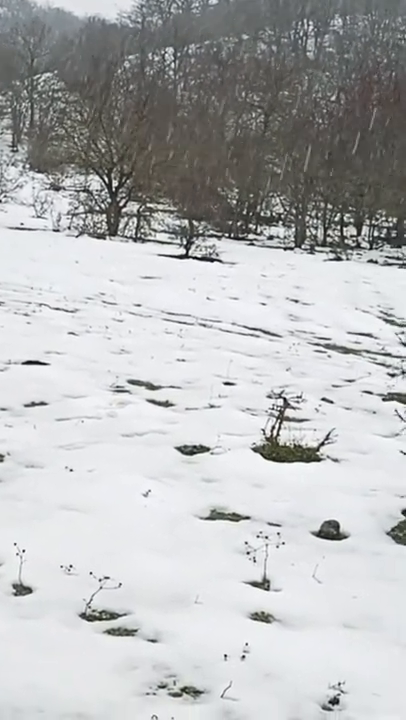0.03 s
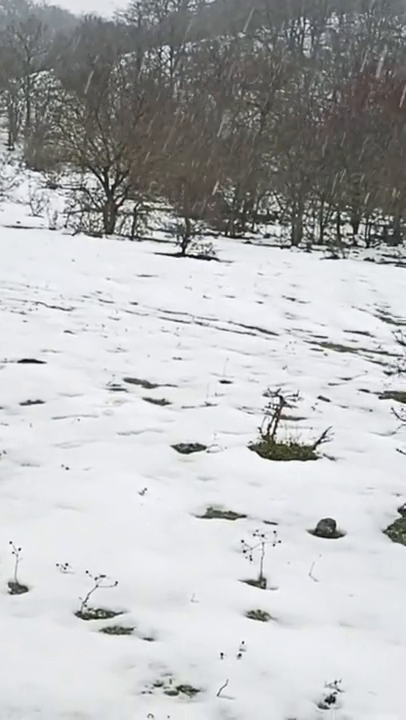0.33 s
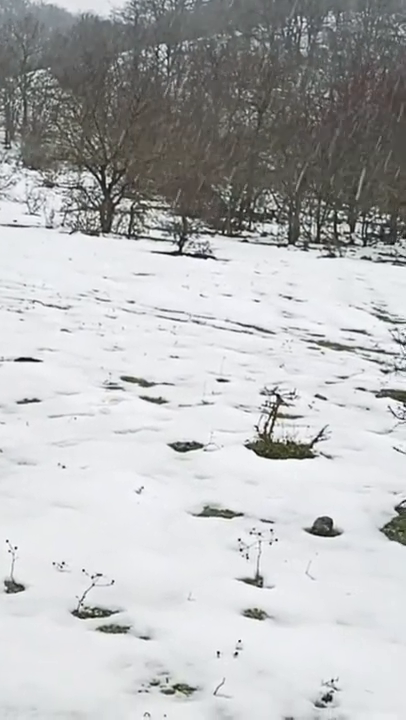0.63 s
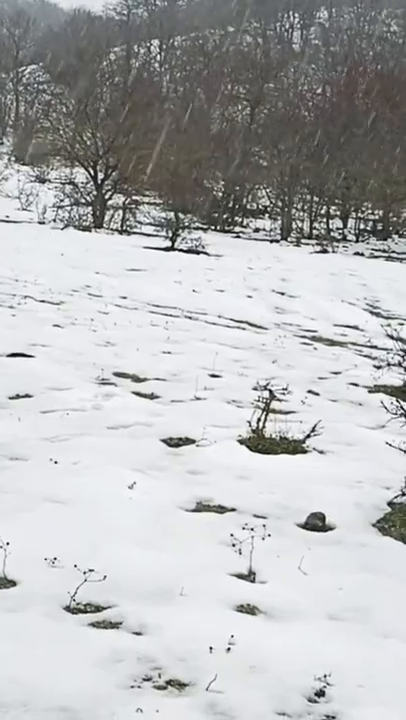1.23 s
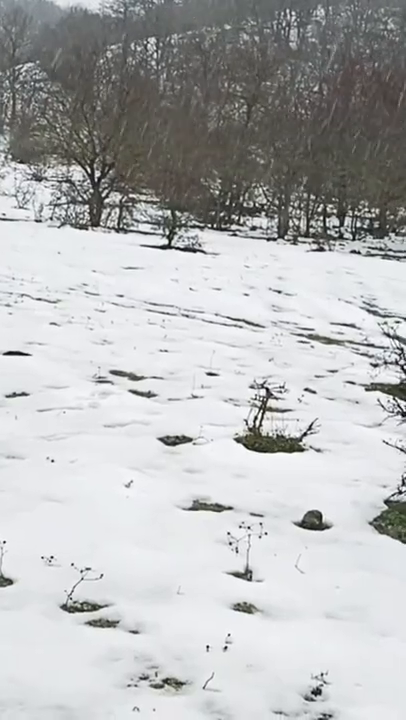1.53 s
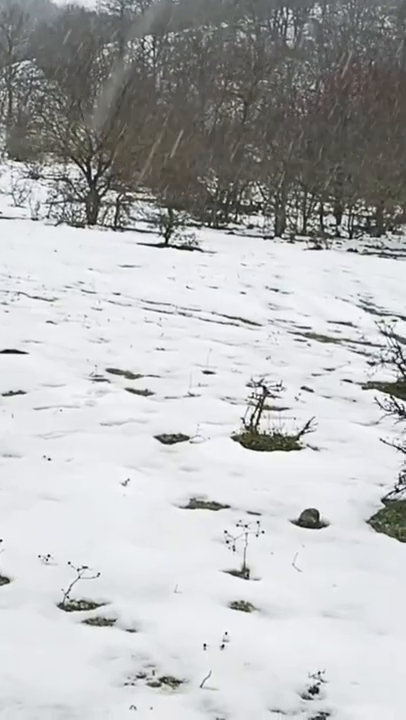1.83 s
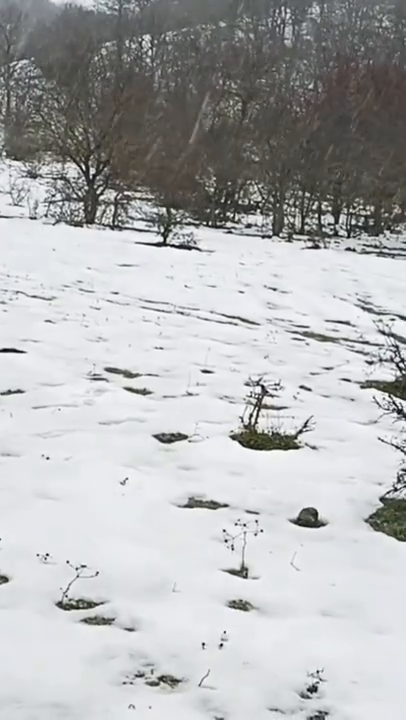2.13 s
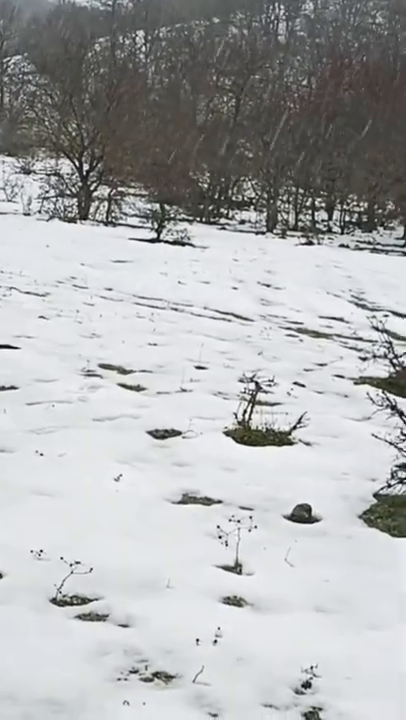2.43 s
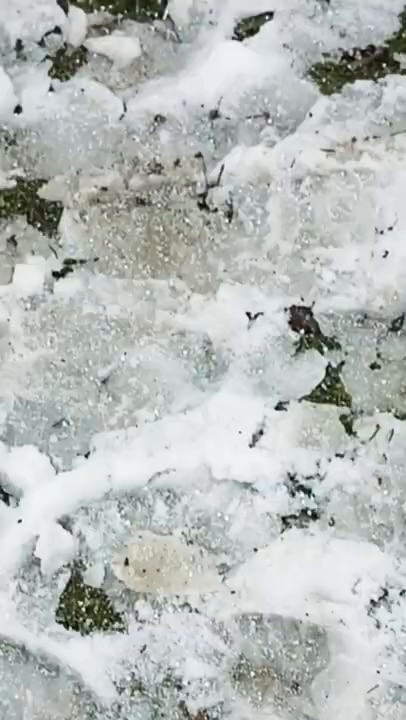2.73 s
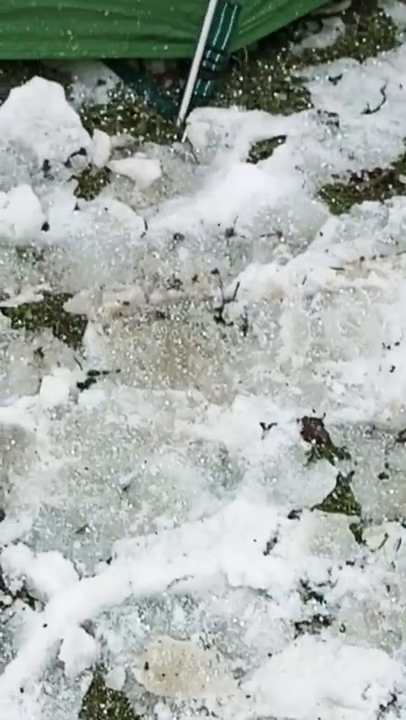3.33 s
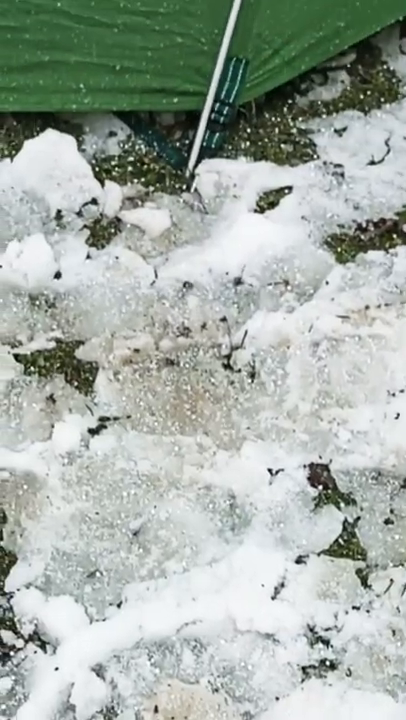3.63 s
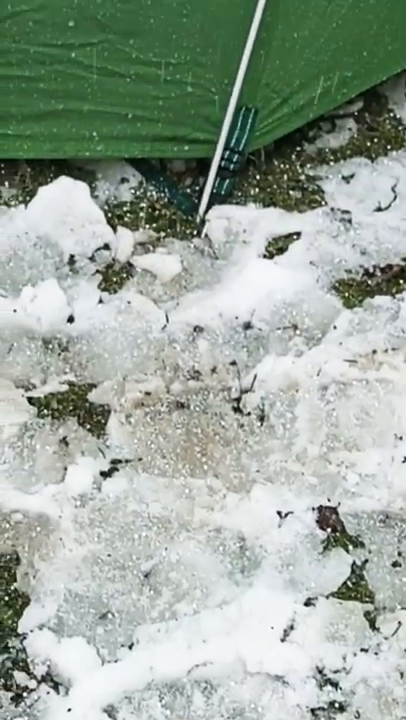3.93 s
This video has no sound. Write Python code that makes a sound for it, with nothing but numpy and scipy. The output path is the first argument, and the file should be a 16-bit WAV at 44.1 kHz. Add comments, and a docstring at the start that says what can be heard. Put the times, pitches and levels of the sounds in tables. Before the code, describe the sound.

Hail falls on a tent in a snowy field, with sharp nearby taps over countless tiny ticks and brief low wind buffets on the left. The sound cuts for an instant, then continues as a finer, thicker patter.

```python
"""A patter of fine hail on a tent in a snowy field: countless small impacts, the farthest merging into hiss.
Close by, single stones snap and thud on the taut fabric and tick as their ice crumbles, while puffs of
turbulent wind buffet the left microphone. The sound drops out for an instant and returns facing the
icy ground, where the patter is denser and finer."""
import sys
import numpy as np
from scipy import signal
from scipy.fft import rfft, irfft
from scipy.io import wavfile
from scipy.ndimage import uniform_filter1d

SR = 44100
rng = np.random.default_rng(int(sys.argv[2]) if len(sys.argv) > 2 else 0)


def master(y):
    """Save y as 16-bit WAV."""
    cut = np.clip(np.atleast_2d(y).T, -1, 1)
    pcm = np.round(cut * 32767)  # scale
    wavfile.write(sys.argv[1], SR, pcm.astype(np.int16))


N = 176400
MILLISECOND = 1 / 1000
PULSE_SIZE = 256  # samples
TICK_HZ, TICK_OCTAVES = 8840, 1.8  # centre and width of an icy tick
BREAK_S = 2.774  # the field gives way to the ice


def from_db(db):
    """Decibels are logarithmic: each 20 dB multiplies the amplitude by ten."""
    return 10 ** (np.asarray(db) / 20)


def unit(x):
    """Normalisation: the energy, or sum of squares, becomes one."""
    return x / np.sqrt(np.sum(x ** 2) + 1e-20)


def add(out, x, s):
    """Superposition: x adds to out from s seconds on."""
    i = max(int(s * SR), 0)
    out[i:i + len(x)] += x[:max(len(out) - i, 0)]


def at_hz(points, size):
    """Interpolation over log frequency gives a curve's value at each bin of a transform."""
    hz, value = np.transpose(points)
    bin_hz = np.arange(size // 2 + 1) * SR / size
    return np.interp(np.log(bin_hz + 1), np.log(hz), value)


def coloured(x, points, size=8192):
    """Minimum-phase filtering: folding the cepstrum makes the given response causal."""
    cepstrum = irfft(np.log(from_db(at_hz(points, size))))
    cepstrum[1:size // 2] *= 2
    cepstrum[size // 2 + 1:] = 0
    return signal.fftconvolve(x, irfft(np.exp(rfft(cepstrum))))[:len(x)]


def pulse(hz, octaves, turn):
    """An impact is brief, hence broadband: a bell-shaped spectrum around hz, its phase given in turns."""
    distance = np.log2((np.arange(PULSE_SIZE // 2 + 1) * SR / PULSE_SIZE + 1) / hz)
    spectrum = np.exp(-(distance / octaves) ** 2 + 2j * np.pi * turn)
    return unit(np.roll(irfft(spectrum), PULSE_SIZE // 2))


def burst(decay_s, size=2048):
    """Damping: noise of unit energy dies away exponentially."""
    return unit(rng.standard_normal(size) * np.exp(-np.arange(size) / SR / decay_s))


def through_fabric(blow, seam_s):
    """Waves in a membrane: a blow ripples, shivers and reflects from a seam, its energy conserved."""
    ripple = from_db(-10.5) * burst(decay_s=0.001)
    shiver = from_db(-18) * burst(decay_s=0.005)
    response = np.r_[1, ripple + shiver]
    add(response, from_db([-7.5]), seam_s + 0.5 / SR)  # the echo from the seam
    return unit(signal.fftconvolve(blow, response)) * np.sqrt(np.sum(blow ** 2))


def flurry():
    """Modulation of the hail: a slow level in dB, random clumps of spread 1, and the hiss's gain."""
    # Each row: time in seconds, strength of the patter in dB.
    strength = [(0, -1), (.2, -2.5), (.6, -2), (1.0, -1.5), (1.3, -1), (1.65, -0.5), (1.8, -3), (2.1, 0),
                (2.3, -2), (2.6, -2), (2.93, -1), (3.33, -3.5), (3.44, -3), (3.62, -2.5), (4, -1.5)]
    flurry_db = np.interp(np.arange(N) / SR, *np.transpose(strength))
    clump_s, hiss_share = 0.016, 0.68
    window = int(clump_s * SR)
    clumps = uniform_filter1d(uniform_filter1d(rng.standard_normal(N), window), window)
    clumps /= clumps.std()
    return flurry_db, clumps, from_db(hiss_share * (flurry_db + clumps))


def hiss(spectrum, level_db):
    """Incoherent addition: far grains and moving air merge into noise, alike in both ears only low down."""
    # Each row: frequency in Hz, correlation between the ears.
    likeness = [(50, 0.1), (130, 0.73), (300, 0.61), (640, 0.59), (1300, -0.83), (2500, -0.14),
                (15000, -0.031)]
    alike = np.clip(at_hz(likeness, N), -1, 1)
    mid, side = rfft(rng.standard_normal((2, N)))
    ears = np.sqrt((1 + alike) / 2) * mid + np.sqrt((1 - alike) / 2) * side * [[1], [-1]]
    return irfft(ears * from_db(level_db + at_hz(spectrum, N)), N)


def patter(per_s, level_db, spread_db, middle_hz, scatter_octaves, width_octaves, spots=32):
    """Shot noise: small stones land at random on many spots, each with its own pitch and direction."""
    out = np.zeros((2, N))
    size_limit, seam_s = 3.23, 0.00045  # the limit counts spreads above level_db
    sizes = from_db(level_db + spread_db * np.minimum(rng.exponential(1, N), size_limit))
    clicks = sizes * (rng.random(N) < per_s / SR) * rng.choice([-1, 1], N)
    spot = rng.integers(0, spots, N)
    for k, quantile in enumerate((np.arange(spots) + 0.5) / spots):
        hz = middle_hz * 2 ** (scatter_octaves * np.log(quantile / (1 - quantile)) / 2)
        tick = from_db(rng.normal(-2, 4.9)) * pulse(TICK_HZ, TICK_OCTAVES, rng.random())
        blow = pulse(hz, width_octaves, rng.random()) + tick
        for ear in out:
            landing = through_fabric(blow, seam_s * rng.uniform(0.45, 2))
            delay_s = rng.uniform(0, 0.5) * MILLISECOND
            add(ear, signal.oaconvolve(clicks * (spot == k), landing), delay_s)
    return out * np.sqrt(SR * MILLISECOND)


def hail_on_field(flurry_db, clumps, swell):
    """Common modulation: far hiss and nearer patter rise and fall with the same flurry."""
    # Each row: frequency in Hz, relative level of the hiss in dB.
    spectrum = [(20, -21), (45, -17), (80, 4.5), (150, 1), (400, 0.5), (1000, -1), (2500, 1.5), (4500, -4),
                (8000, -6.5), (12000, -5), (15500, -4)]
    far = swell * hiss(spectrum, level_db=-44.5)
    return far + patter(per_s=330 * from_db(4.5 * clumps), level_db=flurry_db - 54.5, spread_db=4,
                        middle_hz=2750, scatter_octaves=0.32, width_octaves=0.52)


def near_stones():
    """Impulsive excitation: each stone snaps the fabric, pushes it with a thud and ticks as it crumbles."""
    # Each row: time in seconds, snap level in dB, snap pitch in Hz, snap width in octaves, thud and tick levels
    # in dB before their fixed gains, delay of the seam's echo in ms, lead of the left ear in ms.
    stones = [(0.0385, -32.5, 3200, 0.54, -60.0, -42, 0.67, 0.016),
              (0.0972, -37.5, 2630.0, 0.61, -58, -47, 0.63, 0.1),
              (0.1275, -20.5, 2500, 1, -38, -28, 0.37, 0.42),
              (0.1624, -39, 3200.0, 1.1, -60.0, -53, 0.29, 0.26),
              (0.1818, -46, 4540, 0.27, -32.0, -38, 0.63, 0.38),
              (0.2058, -50.0, 4400.0, 1.4, -60, -35, 0.76, 0.3),
              (0.2141, -37, 5500, 0.7, -56, -29.5, 0.43, -0.019),
              (0.226, -28.0, 3020.0, 0.88, -38.5, -32.5, 0.3, 0.38),
              (0.2884, -39, 2970.0, 0.49, -60.0, -35.5, 0.44, 0.34),
              (0.311, -33.5, 2410.0, 1.35, -54.0, -38, 0.28, 0.28),
              (0.3133, -29, 2820, 0.68, -43, -39, 0.7, 0.38),
              (0.402, -40, 2100, 0.5, -44.5, -34.5, 0.95, 0.31),
              (0.461, -38.5, 2950.0, 0.74, -43, -58, 0.46, -0.13),
              (0.6265, -25.5, 2510.0, 1.43, -35.5, -37, 0.48, -0.18),
              (0.7307, -49, 2820.0, 0.56, -47, -46, 0.62, 0.3),
              (0.7428, -30.5, 1720, 0.88, -59, -39.0, 0.29, 0.27),
              (0.876, -32, 2550, 1.3, -39.5, -38, 1.03, 0.46),
              (0.8875, -37.5, 2690.0, 0.58, -62, -45, 0.82, 0.43),
              (0.9443, -26.5, 2990, 1.26, -41, -32.5, 0.26, 0.33),
              (0.9803, -20.5, 1820, 0.87, -40.5, -35, 0.36, 0.27),
              (1.067, -40, 2470.0, 1.6, -53, -41, 0.24, 0.43),
              (1.1732, -35.5, 2080.0, 0.71, -50, -42, 0.81, -0.1),
              (1.1859, -37, 2970.0, 0.61, -39, -44.0, 0.8, -0.13),
              (1.3095, -21.5, 2580, 0.52, -40.5, -28.5, 0.51, 0.32),
              (1.3336, -36.5, 2060.0, 0.38, -52, -31, 0.47, -0.1),
              (1.355, -37.5, 2550.0, 0.73, -60.0, -35, 0.98, -0.13),
              (1.467, -28, 2400, 0.58, -54.0, -26.5, 0.24, 0.31),
              (1.545, -26, 1920.0, 0.65, -41, -44, 0.97, 0.26),
              (1.6009, -26.5, 2800, 0.66, -39.5, -31, 0.56, 0.3),
              (1.6185, -28.5, 4100, 0.94, -60.0, -33.5, 0.88, -0.37),
              (1.6603, -42, 4340, 0.64, -34, -37, 0.92, 0.4),
              (1.6662, -32, 3460.0, 0.88, -53, -34.5, 0.42, -0.28),
              (1.9123, -28.5, 2560, 0.51, -60.0, -37, 0.58, 0.18),
              (1.9518, -28, 2300, 0.94, -41.5, -32, 0.5, 0.29),
              (1.956, -36, 2470.0, 0.77, -52, -55.0, 1.3, 0.28),
              (1.9972, -39, 3060, 0.35, -62, -34, 0.45, -0.51),
              (2.032, -30, 2930.0, 0.41, -32, -32, 0.52, -0.13),
              (2.055, -39.0, 3720.0, 0.36, -47, -33.5, 0.94, -0.1),
              (2.0687, -30, 2270, 0.46, -39, -32, 1.14, -0.17),
              (2.0883, -30, 2730.0, 0.92, -52, -40, 0.96, -0.34),
              (2.1039, -36, 2930, 0.8, -44, -46, 0.56, 0.3),
              (2.1142, -23, 2730, 0.56, -40, -35.5, 1.19, 0.35),
              (2.1247, -38, 2560.0, 0.64, -60.0, -55.0, 0.76, 0.3),
              (2.1292, -37, 2670.0, 0.36, -58, -55.0, 1.6, 0.3),
              (2.1768, -26.5, 2650, 0.58, -43.5, -34, 0.78, 0.37),
              (2.193, -37.5, 2930.0, 0.56, -60.0, -51, 0.43, 0.42),
              (2.2152, -36, 1200, 1, -39.5, -37, 0.77, 0.29),
              (2.233, -44, 2500.0, 0.24, -58, -36, 0.36, 0.33),
              (2.3195, -41.5, 1200, 0.81, -53, -50, 0.35, 0.28),
              (2.433, -42, 1300, 0.9, -48, -50, 0.67, 0.29), (2.5707, -28, 1990, 0.55, -63, -33, 0.23, 0.3),
              (2.688, -29, 1620, 1.24, -58, -39, 0.4, -0.19),
              (2.9553, -41.0, 1940, 0.28, -40, -33, 0.56, -0.22),
              (3.1287, -37.5, 5550, 0.44, -34.5, -40, 0.37, 0.36),
              (3.197, -36, 2570.0, 0.73, -64, -48, 0.35, 0.49),
              (3.3903, -37.5, 1790.0, 0.68, -52, -42, 0.98, 0.37),
              (3.41, -34, 3510.0, 0.68, -50.0, -46.5, 0.49, 0.45),
              (3.4244, -29.5, 2140, 1.3, -62, -37, 1.23, 0.34),
              (3.493, -35, 3600.0, 0.37, -57, -48, 0.68, 0.25),
              (3.594, -59, 1890.0, 0.41, -57, -41, 0.5, 0.25),
              (3.8193, -40.5, 2750, 0.45, -48, -32, 0.57, 0.35),
              (3.9855, -30.5, 2650, 0.7, -58, -34, 0.34, 0.27)]
    thud_gain_db, tick_gain_db = 1, 1.07
    out = np.zeros((2, N))
    for s, snap_db, hz, octaves, thud_db, tick_db, seam_ms, lead_ms in stones:
        turn = rng.random()
        snap = from_db(snap_db) * pulse(hz, octaves, turn)
        thud = from_db(thud_db + thud_gain_db) * pulse(0.33 * hz, octaves=1.35, turn=turn)
        for ear, arrival in zip(out, (s - lead_ms * MILLISECOND, s)):
            tick = from_db(tick_db + tick_gain_db) * pulse(TICK_HZ, TICK_OCTAVES, rng.random())
            crumbling = signal.fftconvolve(tick, np.r_[1, from_db(-5) * burst(decay_s=0.0018)])
            for part in (snap + thud, crumbling):
                add(ear, through_fabric(part, seam_ms * MILLISECOND), arrival - PULSE_SIZE / 2 / SR)
    return out * np.sqrt(SR * MILLISECOND)  # levels refer to the energy spread over one millisecond


def wind():
    """Turbulence: each puff swells low pressure fluctuations at the ports, the right one sheltered."""
    # Each row: time of the peak in seconds, level in dB, half length in seconds.
    puffs = [(0.04, -53.5, 0.027), (0.144, -50.5, 0.023), (0.211, -47.5, 0.013), (0.274, -43.5, 0.013),
             (.34, -52, 0.091), (0.475, -32, 0.013), (0.56, -47, 0.026), (0.688, -47.5, 0.031),
             (0.782, -38, 0.011), (0.818, -25, 0.0069), (0.852, -40.5, 0.018), (1.046, -54.5, 0.047),
             (1.166, -45, 0.019), (1.208, -31, 0.0047), (1.343, -49, 0.053), (2.713, -44.5, 0.013)]
    # Each row: frequency in Hz, relative level of the eddies in dB.
    spectrum = [(20, -18), (40, -35), (65, -2), (100, 1), (170, -4), (250, -18), (400, -19), (1000, -81)]
    low_hz, high_hz, shelter_db = 57, 210, -25
    t = np.arange(N) / SR
    swell = np.sqrt(sum(from_db(db) ** 2 * np.exp(-((t - s) / half) ** 2) for s, db, half in puffs))
    eddies = signal.hilbert([coloured(rng.standard_normal(N), spectrum) for ear in range(2)])
    eddies = eddies.real / (abs(eddies) + abs(eddies).mean() / 2)  # evens out the envelope
    low_cut = signal.butter(3, low_hz, "high", fs=SR, output="sos")
    high_cut = signal.butter(3, high_hz, fs=SR, output="sos")
    rumble = signal.sosfilt(np.r_[low_cut, high_cut], swell * eddies / eddies.std())
    return rumble * from_db([[0], [shelter_db]])


def hail_on_ice(flurry_db, clumps, swell):
    """A higher impact rate fuses into a finer texture; the left ear hears more of its treble."""
    # Each row: frequency in Hz, relative level of the hiss in dB.
    spectrum = [(20, -30), (50, -12), (110, 5), (180, 4.5), (450, 0), (1000, -1.5), (2500, 0), (4500, 1),
                (8000, -6.5), (12000, -4.5), (15500, -10)]
    # Each row: frequency in Hz, gain of the left side in dB.
    left_gain = [(100, -1.5), (1000, 0.5), (2500, 7), (5000, 0), (8000, 5.5), (12000, 4), (15500, 7.5)]
    far = swell * hiss(spectrum, level_db=-43.5)
    left, right = far + patter(per_s=1400 * from_db(3 * clumps), level_db=flurry_db - 55.3, spread_db=3,
                               middle_hz=2490, scatter_octaves=1.05, width_octaves=0.77)
    return np.array([coloured(left, left_gain), right])


def scene():
    """Superposition: near stones and wind add to the hail, first over the field, then over the ice."""
    flurry_db, clumps, swell = flurry()
    field = hail_on_field(flurry_db, clumps, swell)
    ice = hail_on_ice(flurry_db, clumps, swell)
    return np.where(np.arange(N) / SR < BREAK_S, field, ice) + near_stones() + wind()


def record(dry):
    """Frequency response: two ports colour the sound; it drops out briefly, and a low-pass cuts the top."""
    # Each row, in both tables: frequency in Hz, gain of the microphone port in dB.
    left_port = [(100, 0.5), (700, -1), (1500, -3.5), (2400, -9), (3400, -7.5), (4600, -3), (6500, -5),
                 (7400, -11), (9200, -8.5), (11000, -4.5), (11900, 0), (13500, -2.5), (15500, -11.5)]
    right_port = [(100, 0), (700, 0.06), (1200, 2.5), (2500, 2), (3400, 2.5), (3900, 0), (5200, -1),
                  (6700, 4), (7400, -0.5), (9000, -5), (10800, -6.5), (12000, -3), (15500, -4.5)]
    fade_out_s, gap_s, fade_in_s, floor_db = 0.034, 0.014, 0.019, -54
    cutoff_hz = 15700
    t = np.arange(N) / SR - BREAK_S
    falling, rising = (-t - gap_s / 2) / fade_out_s, (t - gap_s / 2) / fade_in_s
    fade = np.clip(np.maximum(falling, rising), 0, 1) ** 2
    heard = np.array([coloured(dry[0], left_port), coloured(dry[1], right_port)])
    heard *= np.maximum(fade, from_db(floor_db))
    return signal.sosfilt(signal.ellip(10, 0.2, 70, cutoff_hz, fs=SR, output="sos"), heard)


dry = scene()
out = record(dry)
master(out)
```